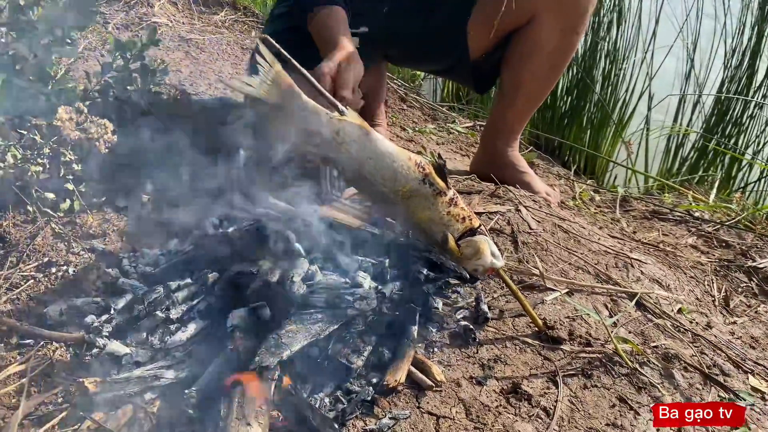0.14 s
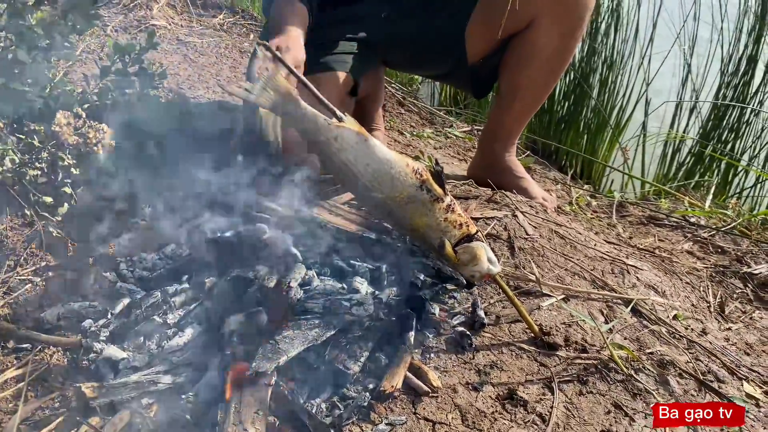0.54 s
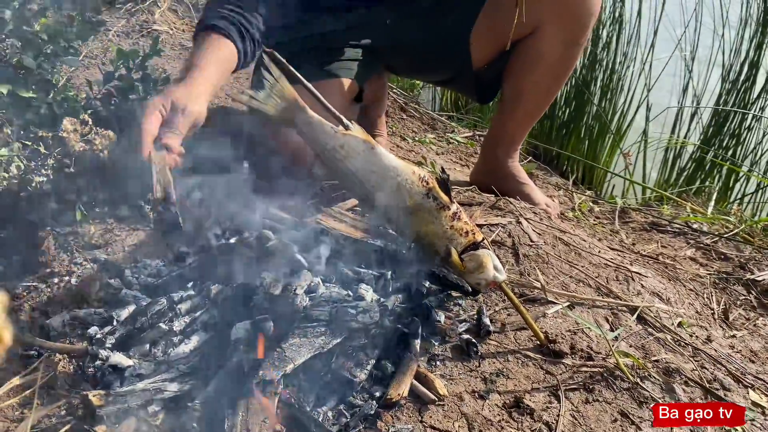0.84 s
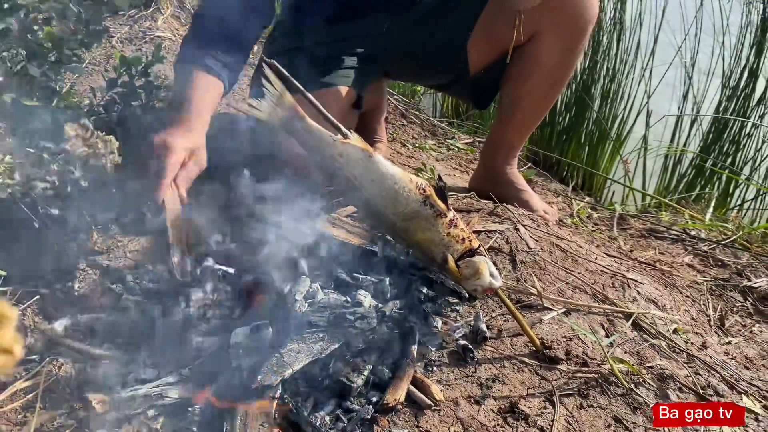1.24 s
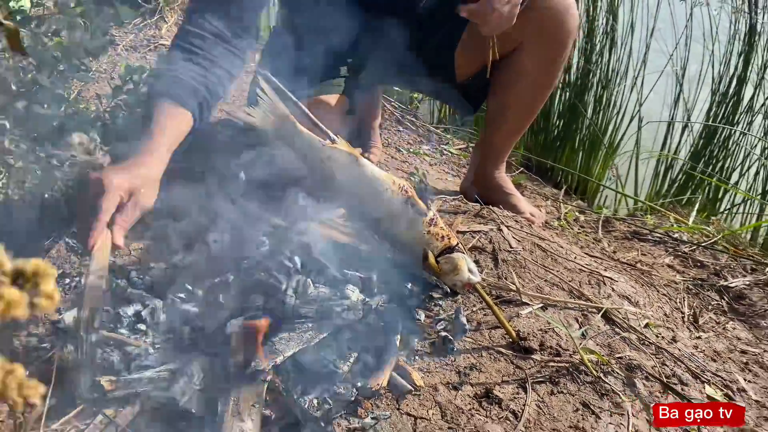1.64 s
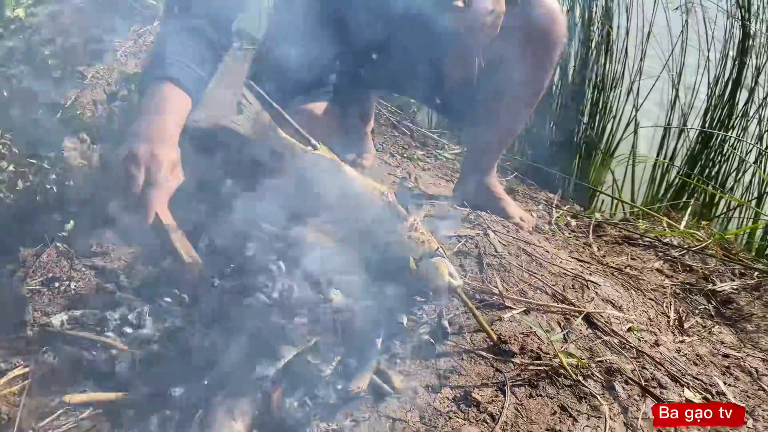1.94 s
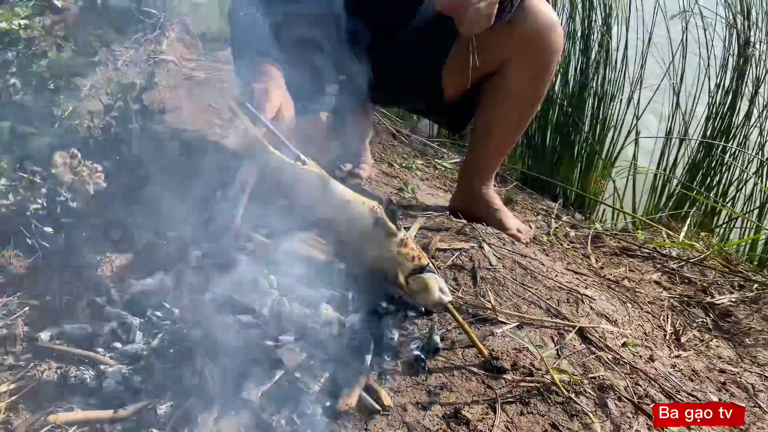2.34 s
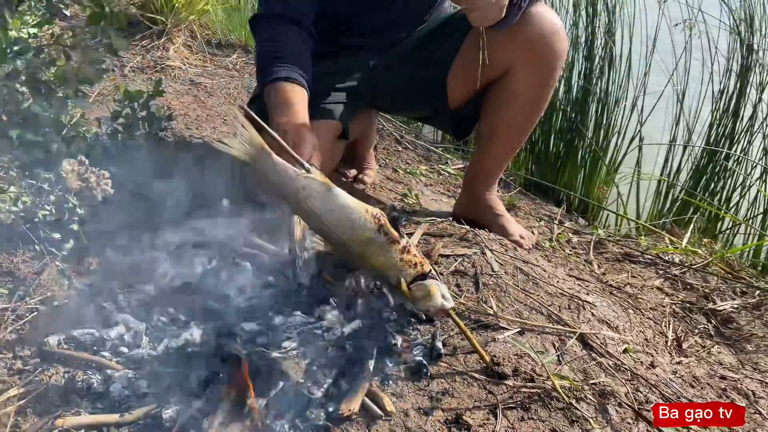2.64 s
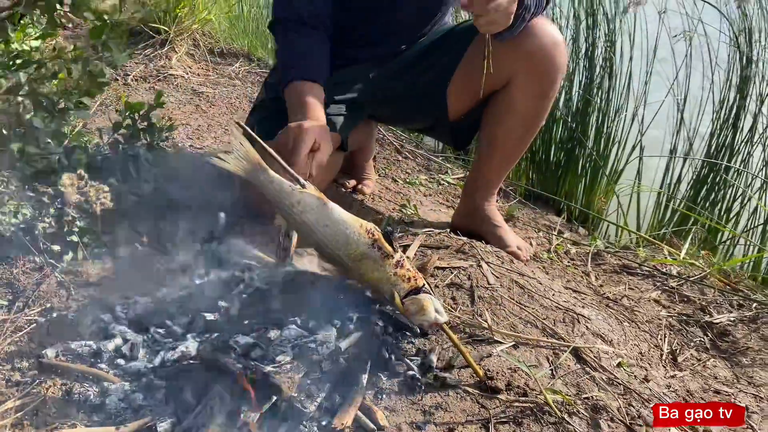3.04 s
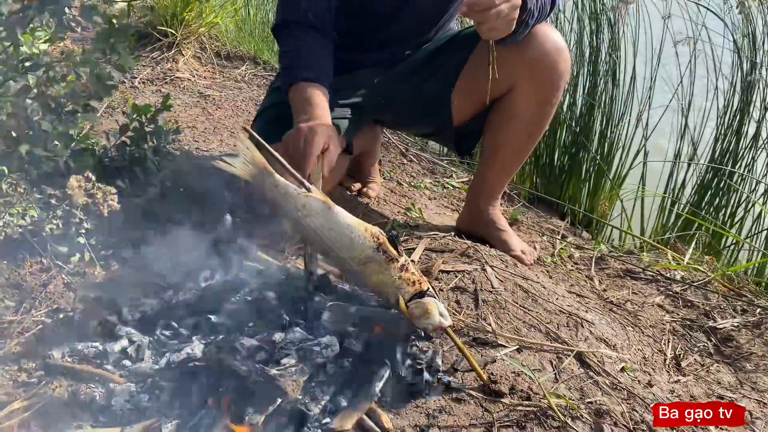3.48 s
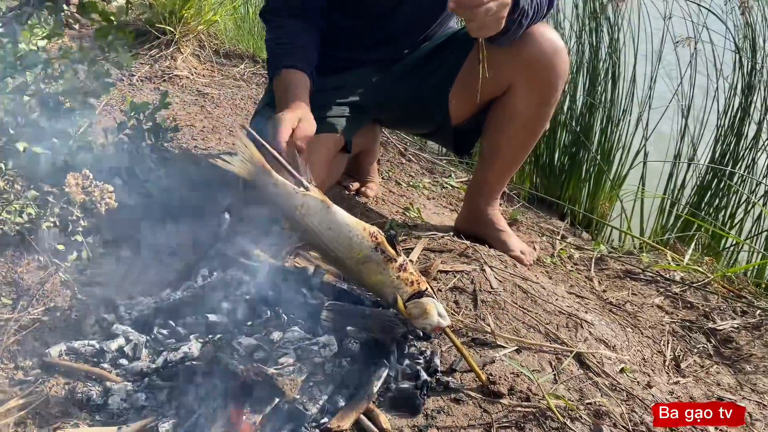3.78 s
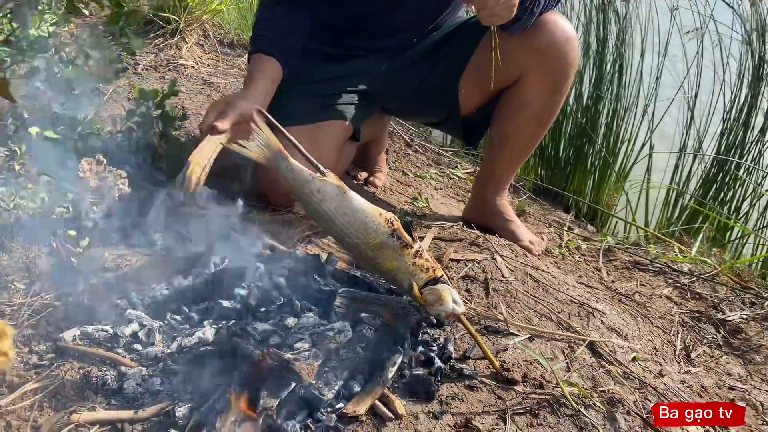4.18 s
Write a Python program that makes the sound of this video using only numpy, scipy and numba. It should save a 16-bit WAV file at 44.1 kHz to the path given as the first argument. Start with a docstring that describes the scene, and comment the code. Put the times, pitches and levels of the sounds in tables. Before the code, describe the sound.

Burning wood crackles and embers hiss softly; then a stick scrapes hard through brittle coals, lumps knocking, with light wind bumps.

```python
"""Embers fizz and flare close by while burning wood snaps and crackles in a smoky riverbank fire.
A fish grills there on a skewer, adding no sound of its own. A stick stirs the embers, then rakes them
hard twice: crushed grains ring the stick and charcoal lumps knock. A light breeze rumbles and bumps.
Fire and grit are grains and decaying sines, colored and scattered; the air is filtered noise and swells."""
import sys
import numpy as np
from scipy import signal
from scipy.fft import rfft, irfft, next_fast_len
from scipy.io import wavfile
from scipy.ndimage import uniform_filter1d
from numba import njit

SR = 44100
rng = np.random.default_rng(int(sys.argv[2]) if len(sys.argv) > 2 else 0)


def inscribe(sig):
    """Save sig as 16-bit PCM at rate SR to the path in sys.argv[1].

    A 1-D sig is mono; a 2-D sig holds one channel per row.
    Samples are clipped to [-1, 1] before scaling.
    """
    pcm = np.round(np.clip(np.atleast_2d(sig).T, -1, 1) * 32767)
    wavfile.write(sys.argv[1], SR, pcm.astype(np.int16))


N = 190230
TIME = np.arange(N) / SR
SIZE = next_fast_len(N + 8192, real=True)
FREQ = np.arange(SIZE // 2 + 1) * SR / SIZE

# Levels below are relative: layer gains and coloring follow.
# embers simmering between flares: (time [s], level [dB])
SIMMER_LEVEL = [(0, -55.5), (.75, -56.5), (1.0, -53.5), (2.1, -50.5), (2.3, -52.5), (3.6, -54.5),
                (3.83, -54), (4.05, -49)]
# moisture flaring up on the embers: (start [s], length [s], level [dB])
MOISTURE_FLARES = [(0.0, 0.17, -56.5), (0.803, 0.11, -46.5), (1.137, 0.088, -46.5), (1.665, 0.093, -41),
                   (2.355, 0.035, -48.5), (3.958, 0.027, -43.5)]
# loudest snaps of the wood: (time [s], level [dB], treble over mids [dB], pitch [Hz])
WOOD_SNAPS = [(.0233, -45, -10, 4060), (0.0518, -45, -14, 3200), (0.0645, -35, -6, 3500),
              (0.0988, -45.5, -4, 6500), (0.1143, -40, -5, 7000), (.159, -45, -14, 4660),
              (0.182, -42, 3, 6900), (0.214, -40.5, -3, 3800), (0.2825, -49, -1, 7200),
              (.3292, -47.5, -5, 3900), (.357, -61, -10, 4600), (0.472, -38, -6, 3200),
              (0.5527, -31, -9.5, 3300), (0.621, -46, -2, 6700), (0.641, -44, -16, 4500),
              (0.663, -46.5, -7, 6700), (0.756, -48, -20, 4400), (0.8227, -34, 4.5, 3200),
              (0.9486, -36, 5, 5200), (0.994, -37.5, 3, 4500), (1.0115, -40, -1, 4000),
              (1.0723, -40.5, 3, 5500), (1.107, -41.5, 10, 6000), (1.131, -38.5, 0, 4500),
              (1.189, -36, 6, 4000), (1.516, -33, 9, 4500), (1.569, -27, 6, 7550),
              (1.645, -35.5, -10, 3500), (1.671, -34.5, -25, 2820), (1.7046, -28.5, -26, 3800),
              (2.1347, -36, -22, 4600), (2.2395, -46.5, -8, 6500), (2.366, -43, 0, 7000),
              (2.4453, -35, -10, 2980), (2.4726, -37, -10, 4970), (2.741, -28, 0, 6000),
              (3.5055, -31, -9, 4000), (3.554, -35, -6, 4900), (3.758, -43.5, 8, 6000),
              (3.768, -50, -3, 6500), (3.7966, -22.5, -22, 6800), (3.8628, -43, -2, 7500),
              (3.8796, -39.5, -12, 3500), (3.906, -47, -8, 4060), (3.948, -40.5, -6, 4800),
              (4.287, -33.5, -14, 3900)]
# small cracks between the snaps: (time [s], level [dB])
CRACKLE_LEVEL = [(0, -61), (.7, -68), (.95, -62.5), (1.4, -62), (4.3, -61.5)]
# drags of the stick through the coals: (start [s], length [s], level [dB], hollow body over scrape [dB])
STICK_DRAGS = [(1.112, 0.26, -59.5, 8.5), (1.38, 0.78, -62, 6), (2.19, 0.6, -68.5, 5.5),
               (2.507, 0.2, -37, 2), (2.696, 0.27, -35.5, 2.5), (2.98, 0.2, -45.5, 3.5),
               (3.119, 0.13, -38.5, 2), (3.238, 0.14, -38.5, 3), (3.389, 0.074, -45, 2),
               (3.442, 0.18, -53.5, -3), (3.908, 0.35, -62.5, 4.5)]
# the stick biting deeper: (time [s], half length [s], extra level [dB], extra hollow body [dB])
STICK_BITES = [(1.18, 0.056, 5, 7), (1.735, 0.052, 12.5, 8), (2.595, 0.018, 3.5, 2), (2.684, 0.03, 7, 4),
               (2.881, 0.039, 5, 2), (2.955, 0.03, 0, 1.5), (3.324, 0.063, 7, 5), (3.99, 0.027, 15.5, 3.5)]
# hollow ring of the stick: (pitch [Hz], width [Hz], level [dB])
STICK_RESONANCES = [(575, 62, -2.5), (820, 42, -2.5), (997, 66, 0), (1420, 100, -11), (1680, 76, -10),
                    (4220, 410, -5.5)]
# stereo lean of the scrape, mostly left: (frequency [Hz], left minus right [dB])
SCRAPE_LEAN = [(200, -2), (380, 4.5), (700, 11), (1300, 1.5), (2400, 4), (4400, 1.5), (8000, -1)]
# charcoal lumps knocking together: (time [s], level [dB], pitch [Hz], rattle decay [s])
CHARCOAL_KNOCKS = [(0.099, -51, 875, 0.0045), (.372, -51.5, 1080, 0.0055), (0.439, -38.5, 1860, 0.0058),
                   (.7297, -52, 2300, 0.0017), (1.161, -43, 2560, 0.0094), (1.19, -47, 950, 0.013),
                   (1.271, -37.5, 1650, 0.0037), (1.313, -35.5, 3370, 0.005), (1.335, -44, 1380, .004),
                   (1.358, -43, 1920, 0.0056), (1.434, -42, 990, 0.0088), (1.497, -41.5, 1890, 0.026),
                   (1.517, -44, 970, .003), (1.538, -41, 2580, 0.0046), (1.645, -41, 610, 0.007),
                   (1.704, -33, 963, 0.0031), (1.722, -34.5, 2330, 0.006), (1.755, -40, 2350, 0.0033),
                   (1.788, -39.5, 3070, 0.0031), (1.852, -43.5, 1020, 0.0027), (1.967, -46, 980, 0.0056),
                   (2.01, -44.5, 1760, 0.0062), (2.264, -46, 1040, 0.0066), (2.318, -43.5, 1958, 0.0072),
                   (2.388, -46.5, 1040, 0.0068), (2.561, -31, 1240, 0.0025), (2.688, -25, 827, 0.013),
                   (2.757, -24, 1600, 0.0077), (2.867, -28, 1250, 0.0073), (2.937, -25, 1340, 0.0059),
                   (2.971, -23.5, 3400, 0.0045), (3.155, -26.5, 2590, 0.0046), (3.67, -46, 2770, 0.0023),
                   (3.746, -44.5, 2970, 0.0036), (3.814, -41, 2780, 0.0053), (3.879, -36, 3430, 0.0044),
                   (3.946, -44, 1540, 0.0047)]
# soft bumps of air on the microphone: (time [s], peak [dB], pitch [Hz], fall [s])
AIR_BUMPS = [(1.2553, -17.5, 94.8, 0.011), (1.458, -26.5, 79, 0.017), (1.561, -31, 88.5, 0.011),
             (1.751, -35, 75, 0.015), (1.779, -37.5, 70, .02), (2.093, -34.5, 79, 0.023),
             (2.293, -30, 70, 0.01), (2.306, -30, 61, 0.015), (2.328, -30.5, 65, 0.025),
             (2.5, -29.5, 68.5, 0.011)]
# moving air: (time [s], level [dB])
BREEZE_LEVEL = [(0, -47), (.3, -47.5), (.8, -50.5), (1.35, -46.5), (1.65, -48), (2.05, -47.5), (2.22, -50),
                (2.9, -48), (3.4, -47), (3.7, -49), (4.3, -49)]
# tone color of the boiling embers: (frequency [Hz], gain [dB])
FIZZ_TONE = [(300, -18.5), (1000, -2), (2000, -5.5), (4000, 0), (5700, -3), (7500, 5), (12000, 4.5),
             (16000, 5)]
# tone color of the snaps: (frequency [Hz], gain [dB])
SNAP_TONE = [(200, -7), (600, -2), (1500, -2.5), (2500, -0.5), (4000, 0), (7000, 7), (11000, 13),
             (16000, 10.5)]
# tone color of the raked grit: (frequency [Hz], gain [dB])
GRIT_TONE = [(100, -3.5), (220, 2), (340, 0), (430, -3.5), (620, -5.5), (1050, -4), (1500, -1.5),
             (2500, 1.5), (4000, -0.5), (5600, -2), (8000, 1.5), (15500, -2)]
# tone color of the breeze: (frequency [Hz], gain [dB])
BREEZE_TONE = [(20, -36), (40, -8), (60, 1), (85, -1), (125, -6), (190, -7.5), (280, -18.5), (450, -26),
               (1000, -37.5), (3000, -37), (16000, -59)]
# phase of the left channel against the right: (frequency [Hz], phase [rad])
LEFT_PHASE = [(0, 0), (600, .4), (1500, 1.8), (3200, 1.4), (4200, 0), (6850, 0)]

LEFT_LAG_S, LEFT_LAG_FROM_HZ = .000233, 6850  # further lag of the left channel's treble
FLARE_RISE_S, FLARE_FADE_S = 0.0043, 0.021
DRAG_ATTACK_S, DRAG_RELEASE_S = 0.048, 0.034
MERGE_DB = -52.5  # boiling strength, before the fizz gain, at which ticks and hiss share evenly
TOP_HZ = 15800


def fizz(pips_db=-1, steam_db=-17, level_db=-1):
    """Moisture boils out of the embers: separate tiny ticks merge into a hiss as it boils harder."""
    strength = boiling()
    sparse = unit(grains(per_s=450, spread_db=3.5, limit_db=17))
    # each pore pops at its own pitch
    pips = clinks(count=900, low_hz=1900, high_hz=16000, cycles=8, spread_db=3.4)
    pips = unit(filtered(pips, np.sqrt(FREQ)))
    sparse = unit(sparse + undb(pips_db) * pips)
    steam = undb(steam_db) * rng.standard_normal(N)
    dense = unit(grains(per_s=2500, spread_db=2.5, limit_db=9)) + steam
    dense_share = 1 / (1 + (undb(MERGE_DB) / strength) ** 4)
    ticks = np.sqrt(1 - dense_share) * sparse + np.sqrt(dense_share) * dense
    flicker = undb(1.8 * walk(40))
    sound = scattered(ticks * flicker, t60_s=.01, mids_db=-1, treble_db=-12)
    return unit(filtered(sound, causal(shape(FIZZ_TONE)))) * strength * undb(level_db)


def boiling():
    """Strength of the fizz: a slow simmer plus, in power, flares that rise quickly, hold and fade."""
    flare_power = np.zeros(N)
    for start_s, length_s, db in MOISTURE_FLARES:
        flare = undb(db) * envelope(start_s, length_s, FLARE_RISE_S, FLARE_FADE_S)
        flare_power += flare ** 2
    return np.sqrt(undb(curve(SIMMER_LEVEL)) ** 2 + flare_power)


def snaps(splinter_s=0.0002, splinter_db=-14, level_db=13, left_db=2.5, ring_db=-7, cycles=9):
    """Gas pockets burst in the wood: a sharp crack, brief splintering, and a short ring of split fibre."""
    t = TIME[:256]
    cracks = np.zeros((2, N + len(t)))  # mids and treble
    noises = rng.standard_normal((len(WOOD_SNAPS), len(t)))
    for (s, db, bright_db, hz), noise in zip(WOOD_SNAPS, noises):
        burst = undb(splinter_db) * noise * np.exp(-t / splinter_s)
        burst[0] = 1  # the crack itself
        ring = np.cos(2 * np.pi * hz * t) * undb(-60 * t * hz / cycles)
        mids = burst + undb(ring_db) * ring / np.linalg.norm(ring)
        crack = np.array([mids, undb(bright_db) * burst])
        i = int(s * SR)
        cracks[:, i:i + len(t)] += crack * undb(db + level_db) * np.sqrt(2 / np.sum(crack ** 2))
    upper = 1 / (1 + (6500 / (FREQ + 1)) ** 4)
    mids, treble = (scattered(c, t60_s=0.028, mids_db=1.5, treble_db=-5.0) for c in cracks)
    sound = filtered(mids, 1 - upper) + filtered(treble, upper)
    sound = filtered(sound, causal(shape(SNAP_TONE)))
    return sound * undb(np.array([[left_db], [-left_db]]) / 2)


def crackle(thin_db=-4):
    """Small cracks between the snaps: woody ticks, each of its own pitch, and thin bright ones."""
    woody = clinks(count=330, low_hz=1100, high_hz=11000, cycles=10, spread_db=3.5)
    thin = grains(per_s=45, spread_db=4, limit_db=7)
    thin = unit(filtered(thin, causal(shape([(1000, -17), (5000, -11), (11000, 3.0)]))))
    sound = scattered(woody + undb(thin_db) * thin, t60_s=.014, mids_db=-3, treble_db=-10)
    return unit(sound) * undb(curve(CRACKLE_LEVEL))


def raking(level_db=3.5, dust_db=-6, lumps_db=-7, coals_db=-11, slip_db=0.76, patchy_db=1.0,
           crumbs_db=-6, crumbs_limit_db=-50):
    """The stick catches and slips, crushing charcoal that rings stick, lumps and coals over ashy hiss."""
    ash = undb(dust_db) * rng.standard_normal(N)
    crush = unit(grains(per_s=6000, spread_db=6.0, limit_db=13.5)) + ash
    grit = scattered(crush, t60_s=.01, mids_db=3.5, treble_db=-7)
    lumps = clinks(count=2400, low_hz=600, high_hz=6000, cycles=36, spread_db=1.4)
    coals = clinks(count=600, low_hz=700, high_hz=3400, cycles=60, spread_db=2.2)
    stones = stereo(undb(lumps_db) * lumps + undb(coals_db) * coals)
    grit = (unit(grit) + stones) * undb(slip_db * walk(90))
    lean = shape(SCRAPE_LEAN) ** np.array([[.5], [-.5]])
    grit = unit(filtered(grit + stick_ring(grit), causal(shape(GRIT_TONE)) * lean))
    # hollow lows, crunchy mids and fine dust each come in their own clumps
    body = filtered(grit, 1 / (1 + (FREQ / 1100) ** 4))
    dust = filtered(grit, 1 - 1 / (1 + (FREQ / 4500) ** 4))
    crunch = grit - body - dust
    crunch, dust, body = (part * undb(patchy_db * walk(70)) for part in (crunch, dust, body))
    scrape, hollow = pressure()
    # even a light touch tips single crumbs over; their strength is capped, so a hard scrape drowns them
    crumbs = clinks(count=1100, low_hz=650, high_hz=4500, cycles=20, spread_db=2.2)
    crumbs = stereo(crumbs) * np.minimum(hollow, undb(crumbs_limit_db)) * undb(crumbs_db)
    return (scrape * (crunch + dust) + hollow * body) * undb(level_db) + crumbs


def pressure():
    """Strength of the scrape and its hollow body: drags hold steady, bites swell them."""
    scrape_power, hollow_power = np.zeros(N), np.zeros(N)
    for start_s, length_s, db, body_db in STICK_DRAGS:
        drag = undb(db) * envelope(start_s, length_s, DRAG_ATTACK_S, DRAG_RELEASE_S)
        scrape_power += drag ** 2
        hollow_power += (drag * undb(body_db)) ** 2
    scrape_extra_db, hollow_extra_db = np.zeros(N), np.zeros(N)
    for s, half_s, db, body_db in STICK_BITES:
        swell = np.exp(-((TIME - s) / half_s) ** 2)
        scrape_extra_db += db * swell
        hollow_extra_db += body_db * swell
    return np.sqrt(scrape_power) * undb(scrape_extra_db), np.sqrt(hollow_power) * undb(hollow_extra_db)


def stick_ring(x, drift=0.029):
    """The stick's resonances shift a little as its tip sinks and lifts."""
    stretch = np.exp(drift * walk(6.2))
    rings = np.zeros((len(x), N))
    for ring, channel in zip(rings, x):
        for hz, width, db in STICK_RESONANCES:
            ring += undb(db) * resonate(channel, hz * stretch, float(width))
    return rings


def knocks(level_db=3, cycles=26, rattle_db=-2):
    """Porous charcoal gives a few short, unrelated partials and a ragged rattle of crumbs."""
    t = TIME[:2048]
    out = np.zeros((2, N + len(t)))  # ring and rattle
    for s, db, hz, rattle_s in CHARCOAL_KNOCKS:
        partials = hz * np.array([[1], [rng.uniform(0.448, 0.592)], [rng.uniform(1.29, 2.38)]])
        decays = undb(-60 * t * partials / cycles)
        ring = undb([0, -8, -5]) @ (np.sin(2 * np.pi * partials * t) * decays)
        crumbs = uniform_filter1d(rng.exponential(size=len(t)) ** 4, size=24)
        rattle = unit(np.sqrt(np.abs(crumbs)) * rng.standard_normal(len(t)))
        rattle = undb(rattle_db) * rattle * np.exp(-t / rattle_s)
        i = int(s * SR)
        out[:, i:i + len(t)] += undb(db + level_db) * np.array([ring, rattle])
    sound = stereo(out[0]) + scattered(out[1], t60_s=0.0085, mids_db=2.0, treble_db=-28)
    tone = shape([(250, -12), (700, -3.5), (3300, -3.0), (5000, -9.5), (9000, -40)])
    return filtered(sound, causal(tone))


def buffets(rise_s=0.0064, level_db=0, sub_db=-8, sub_hz=48, eddy_db=-19):
    """Puffs push the microphone briefly over a slower heave, shedding separate eddies on each side."""
    out, stir = np.zeros(N), np.zeros(N)
    for s, db, hz, fall_s in AIR_BUMPS:
        t = TIME - s
        slope_s = np.where(t < 0, rise_s, fall_s)
        swell = 1 / np.cosh(np.clip(t / slope_s * np.pi / 2, -20, 20))
        heave = undb(sub_db) * np.sqrt(swell) * np.sin(2 * np.pi * sub_hz * t)
        out += undb(db + level_db) * (swell * np.cos(2 * np.pi * hz * t) + heave)
        stir += undb(db + level_db) * np.sqrt(swell)
    tone = shape([(20, -7), (50, 3), (110, -3), (250, -19), (1000, -72)])
    eddies = unit(filtered(rng.standard_normal((2, N)), tone))
    return out + undb(eddy_db) * stir * eddies


def breeze(low_side_db=-9, high_side_db=0):
    """Low, restless rumble of moving air, narrower in the lows, with a faint outdoor hush above it."""
    mid, side = filtered(rng.standard_normal((2, N)), shape(BREEZE_TONE))
    side = filtered(side, shape([(130, low_side_db), (400, high_side_db)]))
    level = undb(curve(BREEZE_LEVEL) + 2.36 * walk(6.01))
    return unit(np.array([mid + side, mid - side])) * level


def clinks(count, low_hz, high_hz, cycles, spread_db):
    """Bits crack or tumble at random, each a short decaying sine of its own pitch."""
    out = np.zeros(N + SR)
    for when, pitch, size in rng.random((count, 3)):
        hz = low_hz * (high_hz / low_hz) ** pitch
        t = TIME[:int(SR * cycles / hz)]
        i = int(when * N)
        strength = undb(-spread_db * np.log(size + 0.052)) * np.sqrt(hz)
        decay = np.exp(-np.log(1000) * t * hz / cycles)  # down 60 dB after the given cycles
        out[i:i + len(t)] += strength * np.sin(2 * np.pi * hz * t) * decay
    return unit(out[:N])


def grains(per_s, spread_db, limit_db):
    """Tiny fractures at random moments: many faint, few strong."""
    size_db = np.minimum(spread_db * rng.exponential(size=N), limit_db)
    return (rng.random(N) < per_s / SR) * rng.choice([-1, 1], N) * undb(size_db)


def scattered(x, t60_s, mids_db, treble_db):
    """Direct ticks plus a brief, ever different scatter from logs and ground on each side."""
    decay = undb(-120 * TIME[:4096] / t60_s)  # decay of energy
    energy = np.abs(filtered(x ** 2, rfft(decay / decay.sum(), SIZE)))
    tail = np.sqrt(energy) * rng.standard_normal((2, N))
    tone = shape([(900, mids_db - 0.5), (1800, mids_db), (5500, mids_db), (7200, treble_db)])
    return stereo(x) + filtered(tail, tone)


def stereo(x):
    """Left and right share one sound; the left is shifted in phase by frequency and lags in the treble."""
    phase = np.interp(FREQ, *np.transpose(LEFT_PHASE))
    lag = 2 * np.pi * LEFT_LAG_S * np.maximum(FREQ - LEFT_LAG_FROM_HZ, 0)
    return np.array([filtered(x, np.exp(1j * (phase - lag))), x[:N]])


@njit
def resonate(x, hz, width):
    """Band-pass whose centre may move; gain 1 at the centre."""
    y, band, low = np.empty(len(x)), 0., 0.
    for i in range(len(x)):
        g, k = np.tan(np.pi * hz[i] / SR), width / hz[i]
        v = (band + g * (x[i] - low)) / (1 + g * (g + k))
        band = 2 * v - band
        low += 2 * g * v
        y[i] = k * v
    return y


def envelope(start_s, length_s, attack_s, release_s):
    """Straight rise, hold until the length is up, exponential release."""
    t = TIME - start_s
    return np.clip(t / attack_s, 0, 1) * np.exp(-np.maximum(t - length_s, 0) / release_s)


def walk(rate):
    """Slow smoothed chance of rms 1, drawn at the given rate [Hz]."""
    k = max(int(SR / rate), 1)
    held = np.repeat(rng.standard_normal(N // k + 1), k)[:N]
    return unit(uniform_filter1d(uniform_filter1d(held, k), k))


def causal(gain):
    """Minimum-phase response of a gain curve: nothing sounds before the attack."""
    cepstrum = irfft(np.log(gain), SIZE)
    cepstrum[1:SIZE // 2] *= 2
    cepstrum[SIZE // 2 + 1:] = 0
    return np.exp(rfft(cepstrum))


def filtered(x, response):
    """Pass a sound through a frequency response."""
    return irfft(rfft(x, SIZE) * response, SIZE)[..., :N]


def shape(points):
    """Gain at every frequency from (frequency [Hz], gain [dB]) points."""
    hz, db = np.transpose(points)
    return undb(np.interp(np.log(FREQ + 1), np.log(hz), db))


def curve(rows):
    """(time [s], value) rows joined by straight lines."""
    return np.interp(TIME, *np.transpose(rows))


def unit(x):
    """Scale to rms 1."""
    return x / np.sqrt(np.mean(x ** 2))


def undb(db):
    """Decibels to gain."""
    return 10 ** (np.asarray(db) / 20)


def scene():
    """Fire, stick and air together."""
    return fizz() + snaps() + crackle() + raking() + knocks() + buffets() + breeze()


def record(dry):
    """The recorder drops the deepest rumble and cuts the top."""
    dry = filtered(dry, 1 / (1 + (27 / (FREQ + 1)) ** 4))
    return signal.sosfilt(signal.ellip(10, .2, 70, TOP_HZ, fs=SR, output="sos"), dry)


dry = scene()
out = record(dry)
inscribe(out)
```